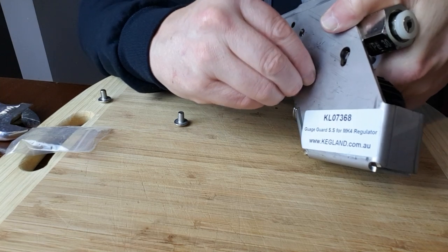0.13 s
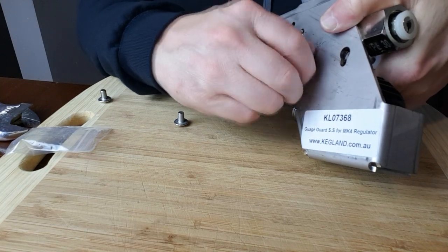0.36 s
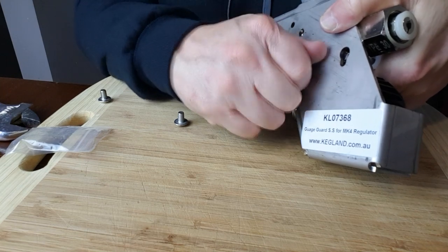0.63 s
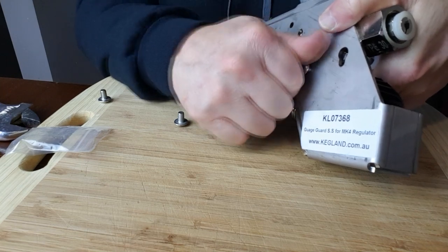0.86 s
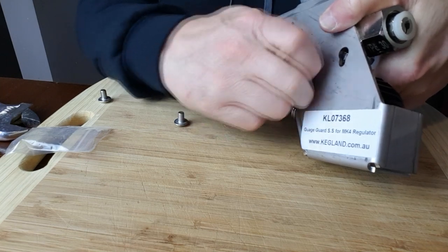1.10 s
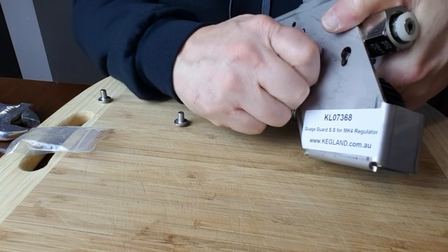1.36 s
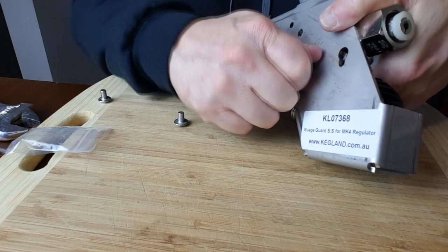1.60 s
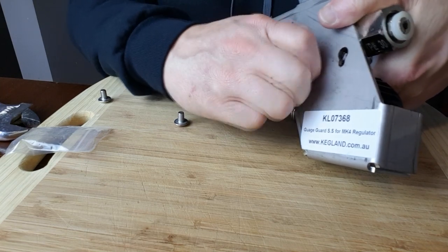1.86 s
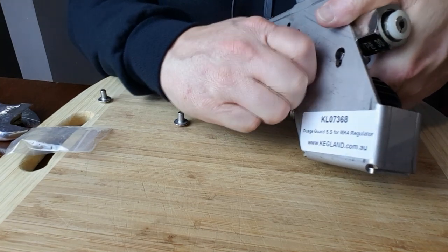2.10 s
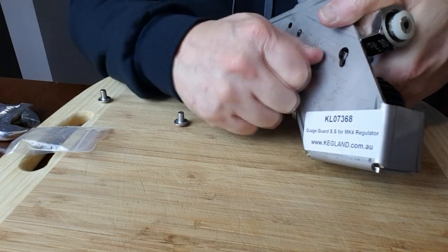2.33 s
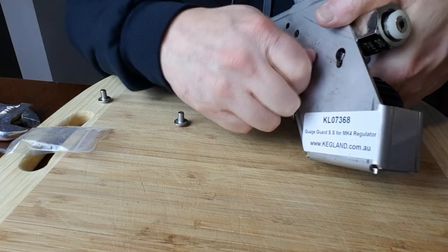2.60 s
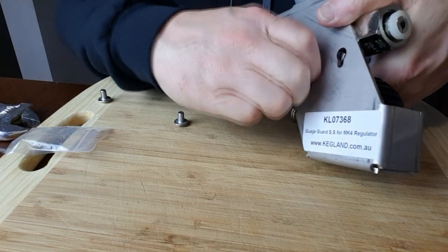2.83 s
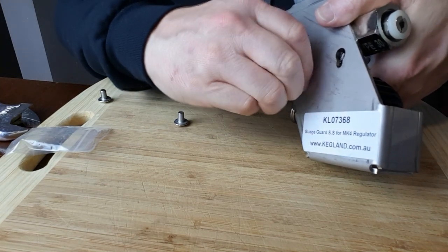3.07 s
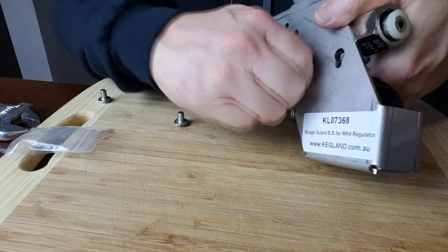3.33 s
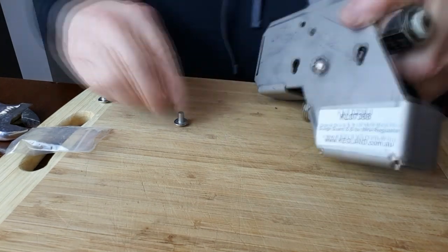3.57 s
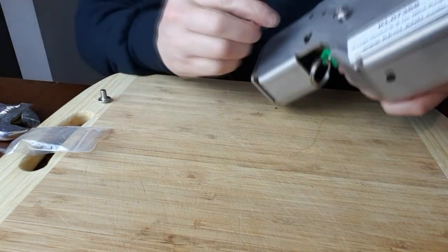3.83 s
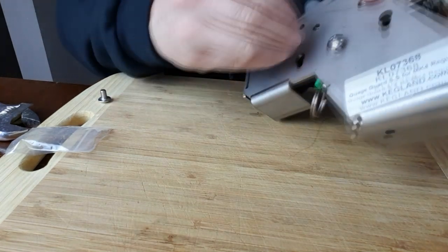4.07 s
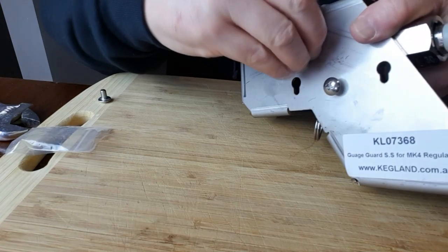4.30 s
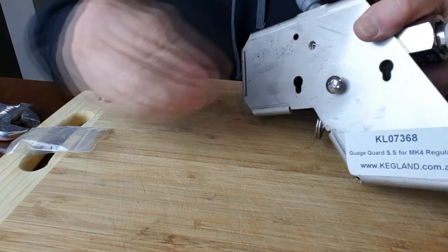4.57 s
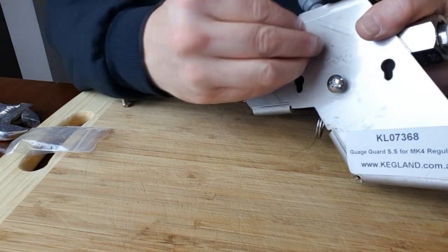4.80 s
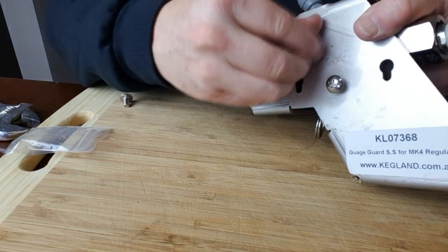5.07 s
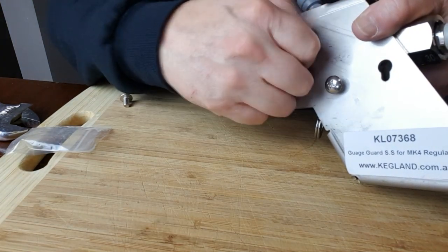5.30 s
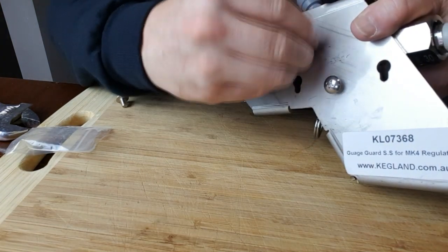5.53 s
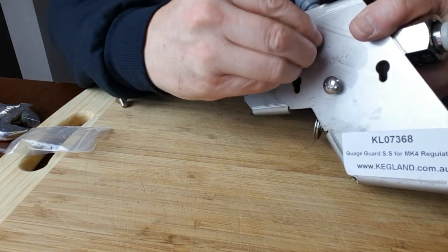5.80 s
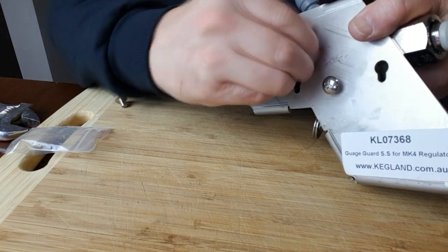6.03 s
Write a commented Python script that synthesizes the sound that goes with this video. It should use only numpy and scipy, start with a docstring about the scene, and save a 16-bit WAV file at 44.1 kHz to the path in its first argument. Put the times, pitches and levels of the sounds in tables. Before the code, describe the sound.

Hands fidget with small screws in a sheet-metal part: dull booming knocks on wood, then brighter, lighter clicks and rattles in a quiet room.

```python
"""Small screws turned into a sheet-metal guard

The guard rests on a wooden board in a quiet room; it rocks and bumps, and forced modes of the board boom
into a close pair of microphones. Ticks, rattles and grating of screw and thread ring the modes of the sheet;
damped taps are short bands of noise, and fingers rub as coloured noise that swells and fades.
A short diffuse tail follows the metal; a soft room tone, a hum and a high hiss lie below."""
import sys
import numpy as np
from scipy import signal
from scipy.fft import rfft, irfft, next_fast_len
from scipy.io import wavfile

SR = 44100
rng = np.random.default_rng(int(sys.argv[2]) if len(sys.argv) > 2 else 0)


def gain_from_db(level_db):
    """Convert decibel levels to linear amplitude factors (20 dB per decade)."""
    decades = np.asarray(level_db, float) / 20
    return 10 ** decades


def to_wav(sig):
    """Store sig (one row per channel, or 1-D mono) as 16-bit WAV at the path in sys.argv[1].

    Samples outside -1..1 are clipped; the rate is SR.
    """
    pcm = np.clip(np.atleast_2d(sig), -1, 1) * 32767
    pcm = np.round(pcm).astype(np.int16)
    wavfile.write(sys.argv[1], SR, pcm.T)  # frames by channels


N = 271656   # samples

TURNED_S = 3.4   # the guard is let go and turned round; until then a hand presses it on the board
NEW_SCREW_S, SEATED_S = 4.16, 5.74   # a loose screw is brought to its hole; it has caught its thread

# Bumps of the guard on the board. Each row: start in seconds, strength in dB,
# knock on the upper modes in dB relative to it, boom pitch in Hz.
BUMPS = [(0.091, -34, -9, 96), (0.118, -41.5, -12, 114), (0.214, -42, -28, 120), (0.312, -35, -5.5, 111),
         (0.401, -42.5, -10, 118), (0.477, -37.5, -3.5, 114), (0.508, -36.5, -11, 116.6),
         (0.653, -42, -7.5, 127), (0.694, -40.5, -3, 114), (0.761, -43, -17, 117),
         (1.183, -51.5, -8.5, 112), (1.577, -32, -10.5, 111.3), (1.838, -33, -3.5, 119),
         (1.95, -53, 5.5, 129), (2.162, -48, -20, 104), (2.253, -40.5, -4, 100), (2.334, -38.5, -22, 95),
         (2.362, -43, -5, 119), (2.415, -36, -4.5, 119), (2.716, -38, -4, 115.5), (2.873, -44, -4, 115),
         (2.952, -43, -35, 115), (3.023, -50, -2, 116), (3.141, -41.5, -1.5, 117),
         (3.203, -41.5, -8.5, 117), (3.453, -39.5, -9.5, 141), (3.532, -47, 11.5, 127),
         (3.621, -26, -11.5, 123), (3.668, -33, -10, 178), (3.983, -35, -11.5, 125), (4.028, -40, -10, 125),
         (4.147, -39, -7, 98), (4.278, -30, -19.5, 88.3), (4.594, -39.5, -12.5, 85),
         (4.659, -49, -2.5, 123), (5.413, -48, -14, 109)]
# Modes of board and table. Each row: pitch in Hz, nominal width in Hz, relative level in dB.
BOARD_MODES = [(80, 3.9, -19), (96.7, 33, 4), (119, 15, 13), (144.9, 91, 9.5), (198.2, 21.5, 3),
               (239, 28.4, 4.5), (400.5, 11.7, -4.5), (465.5, 30.6, -5), (581.7, 30, -10), (670, 51, -12),
               (862, 65, -16.5), (1006, 17, -7.5)]
# Length of a push at the usual strength; it grows by so many dB per dB of strength.
PUSH_HELD_MS, PUSH_LOOSE_MS, PUSH_GROWS_DB, USUAL_PUSH_DB = 7.54, 2.86, 0.22, -40


def board(boom_db=-20.0, knock_base_db=1.5, knock_share=0.8, scatter_db=3.0):
    """Forced vibration: pushes shake low modes and knock upper ones; rocking is a lumpy random force."""
    s, strength_db, knock_db, boom_hz = np.transpose(BUMPS)[:, :, None]
    push_ms = np.where(s < TURNED_S, PUSH_HELD_MS, PUSH_LOOSE_MS)
    push_ms = push_ms * gain_from_db(PUSH_GROWS_DB * (strength_db - USUAL_PUSH_DB))
    ms = np.arange(4000) * 1000 / SR
    part = ms / np.clip(push_ms, 1, 15)
    shake = part * np.exp(1 - part) * np.sin(2 * np.pi * boom_hz * ms / 1000)
    knock_part = part / knock_share
    knock = grit(knock_part * np.exp(1 - knock_part), spread_db=-1.0)
    forces = shake * gain_from_db(boom_db + strength_db), knock * gain_from_db(knock_base_db + strength_db + knock_db)
    rocking = gain_from_db(rocking_db())
    lumps = rms_one(gain_from_db(2.03 * drift(7.3)) * rng.standard_normal(N))
    chance_db = scatter_db * rng.standard_normal((len(s), len(BOARD_MODES)))
    out = 0
    # modes above 170 Hz are the upper ones
    for k, (hz, width_hz, db, upper) in enumerate(evened(BOARD_MODES, [170])):
        pushes = lay(s[:, 0], forces[upper] * gain_from_db(upper * chance_db[:, [k]]))
        out = out + gain_from_db(db) * resonance(pushes + lumps * rocking[upper], hz, width_hz)
    return out


# Force of the guard rocking on the board. Each row: time in seconds, force in dB.
ROCKING = [(0, -49.5), (.45, -52.5), (.72, -42), (.87, -57.5), (1.5, -59), (1.64, -47), (1.78, -61.5),
           (1.95, -60), (2.5, -49.5), (2.65, -58.5), (2.78, -48), (3.5, -58), (3.7, -52), (3.75, -112),
           (3.96, -66), (4.0, -54), (4.36, -67), (5.8, -69), (6.16, -60)]
# Upper modes at the usual force; share of the force's swing that they follow.
UPPER_DB, UPPER_FOLLOWS, USUAL_ROCKING_DB = -59.0, 1, -55


def rocking_db():
    """Common excitation: one rocking force drives the boom and, at its own level, the upper modes."""
    force_db, = in_time(ROCKING)
    return np.array([force_db, UPPER_DB + UPPER_FOLLOWS * (force_db - USUAL_ROCKING_DB)])


# Modes of sheet and screw. Each row: pitch in Hz, nominal width in Hz, relative level in dB.
SHEET_MODES = [(1070, 40, -6), (1605, 70, -3), (1930, 50, -7), (2140, 100, -3), (2525, 110, -2),
               (2740, 100, -5), (2985, 60, -3), (3135, 90, -6), (3600, 110, -5), (4120, 90, -1),
               (4245, 90, -2), (4335, 110, -1), (4667, 80, 1), (5090, 130, -7), (5440, 130, -9),
               (6175, 50, -2), (6550, 70, -4), (6950, 50, -5), (7375, 45, -3), (7563, 35, -4),
               (7850, 110, -4), (8350, 70, -10), (8725, 45, -9), (9460, 45, -11), (10230, 70, -13),
               (11130, 28, -6), (11500, 52, -12), (12620, 34, -9), (12880, 70, -10), (13260, 30, -4),
               (13570, 77, -12)]
# Colour of the broad crack of a contact. Each row: pitch in Hz, relative level in dB.
CRACK = [(500, -7), (1200, -8.5), (2450, -24), (4000, -38), (7500, -12.5), (14500, -14)]
# Hard single ticks. Each row: start in seconds, strength in dB, dull part in dB and bright part in dB
# relative to it, favoured pitch in Hz.
TICKS = [(0.0892, -40.5, -6, -9.5, 2650), (0.097, -46, 1, -21, 2000), (0.338, -42.5, -6, -39, 2230),
         (0.4752, -25, -9, -15, 4200), (1.1253, -58, 18, -17, 1610), (1.5852, -47, 17, -29, 4260),
         (1.8387, -46, -2, -10, 4300), (2.255, -49.5, 10.5, -19, 1950), (2.324, -56, 4, -17, 2500),
         (2.362, -47.5, -1, -18, 3600), (2.418, -53.5, 7, -15, 4300), (2.7219, -44.5, -7, -7, 4350),
         (2.733, -42, -1, -20, 1310), (2.862, -47.5, 6, -21, 4400), (2.9956, -51, 9, -32, 2430),
         (3.051, -55, -5, -23, 3100), (3.15, -47, -7, -23, 2900), (3.262, -57, 0, -19, 2200),
         (3.3, -51.5, 5.5, -27, 2500), (4.1877, -37.5, -34, 4.5, 4220), (4.269, -37, -31, -25, 4620),
         (4.334, -60, -25, 0, 4900), (4.398, -52.5, -18, -4, 4300), (4.403, -48, -25, -15, 4300),
         (4.418, -57.5, -28, -1, 4320), (4.475, -47, -29, -9, 4280), (4.8613, -43, -13, -24, 4800),
         (4.902, -37.5, -9, -12, 4340), (4.913, -41, -28, -25, 2900), (5.236, -57, -5, -17, 2000),
         (5.4288, -46, -13, -9.5, 4770), (5.5081, -62.5, -5, 21, 3160), (5.653, -66, -3, -1, 4300),
         (5.665, -54.5, -6, -8, 4320), (5.677, -59, -9, 2, 4600), (5.6919, -48.5, -21, 0, 4370)]
# Rattle and grating of thread and screw head. Each row: time of the peak in seconds, strength in dB,
# bright part in dB relative to it, fade time in ms (held within 1 to 22), favoured pitch in Hz.
RATTLES = [(0.316, -42.5, -17, 9, 3200), (0.986, -59, 1, 16, 4300), (1.15, -51, -7, 13.4, 4240),
           (1.575, -45, -32, 4.6, 1700), (1.906, -54, -14, 25, 2700), (2.377, -52, -7, 27, 3020),
           (2.876, -52.5, -16, 17, 2900), (3.315, -46.5, -30, 7.6, 1050), (3.679, -51.5, -14, 10, 2900),
           (3.868, -50, -29, 6.8, 2500), (3.895, -33.5, -16, 11.3, 2580), (4.148, -51.5, -14, 11.3, 2440),
           (4.18, -50, 1, 10.7, 2500), (4.204, -50, -6, 5.3, 4300), (4.238, -35, -13.5, 9.1, 4300),
           (4.265, -38, -19, 5, 4640), (4.279, -42.5, -18, 9.7, 2800), (4.373, -55, -11, 7.1, 4200),
           (4.407, -49.5, -2, 7.8, 2900), (4.465, -62, -9, 9.1, 4340), (4.494, -49, -3, 4.4, 4300),
           (4.507, -35.5, -7, 7, 4500), (4.553, -54.5, -1, 5.2, 4500), (4.864, -40.5, -26, 7.4, 2130),
           (4.897, -48, 0, 7.5, 4300), (4.912, -41.5, -0.5, 6, 2200), (4.982, -54, -3, 7.9, 4730),
           (5.085, -61.5, -9, 5, 4220), (5.121, -59.5, 1, 4.2, 4330), (5.296, -62.5, -10, 15, 2500),
           (5.431, -46, -8, 11.3, 4730), (5.516, -60, 10, 11.5, 3140), (5.685, -61, 9, 6.8, 4640)]
# Fade of a tick's tail at the usual strength; harder ticks last longer by so many dB per dB.
TICK_FADE_MS, FADE_GROWS_DB, USUAL_TICK_DB = 1.36, 0.86, -50
TICK_GAIN_DB = 10.0   # common to ticks and fidgets
SWELL_SHARE = 1.4   # rise time over fade time
# A seated screw drives the low modes, a loose one hardly.
RATTLE_DULL_SEATED_DB, RATTLE_DULL_LOOSE_DB = 2.5, -20.5
HELD_DAMPING_DB = -4.5   # the pressing hand mutes the sheet's ringing
SCREW_HZ, BEFORE_SCREW_DB = (4000, 5200), -8   # the loose screw's modes; they are weaker until it is brought


def sheet(scatter_db=2.5, crack_db=-8.0, rattle_crack_db=-8.5, favour_db=5.0, rattle_db=-7.0):
    """Modal synthesis: hard ticks and swelling rattles ring the sheet's modes and crack over broad bands."""
    ms = np.arange(4000) * 1000 / SR
    ticks, rattles = np.array(TICKS), np.array(RATTLES)
    tail_ms = TICK_FADE_MS * gain_from_db(FADE_GROWS_DB * (ticks[:, [1]] - USUAL_TICK_DB))
    sudden = np.exp(-ms / 0.29) + 0.11 * np.exp(-ms / tail_ms)
    fade_ms = np.clip(rattles[:, [3]], 1, 22)
    swell_ms = SWELL_SHARE * fade_ms
    swelling = np.sin(np.pi / 2 * np.minimum(ms / swell_ms, 1)) ** 2
    swelling = swelling * np.exp(-np.maximum(ms - swell_ms, 0) / fade_ms)
    tick_bursts = gain_from_db(TICK_GAIN_DB) * grit(sudden, spread_db=2.0)
    rattle_bursts = gain_from_db(rattle_db) * grit(swelling, spread_db=-0.5)
    bursts = np.vstack([tick_bursts, rattle_bursts])

    seat_db = np.where(rattles[:, 0] < NEW_SCREW_S, RATTLE_DULL_SEATED_DB, RATTLE_DULL_LOOSE_DB)
    rattle_rows = np.c_[rattles[:, :2], seat_db, rattles[:, 2]]
    s, strength_db, dull_db, bright_db = np.vstack([ticks[:, :4], rattle_rows]).T[:, :, None]
    s = s - np.vstack([0 * ticks[:, [0]], swell_ms / 1000])   # a rattle starts one swell before its peak
    favoured_hz = np.vstack([ticks[:, [4]], rattles[:, [4]]])

    crack = [(hz, hz / 4, crack_db + at_hz(CRACK, hz)) for hz in np.geomspace(550, 14500, num=12)]
    # the spot touched favours other modes
    chance_db = scatter_db * rng.standard_normal((len(s), len(SHEET_MODES) + len(crack)))
    grating, fidgeting = grate(), fidgets()
    out = 0
    for k, (hz, width_hz, db, _) in enumerate(evened(SHEET_MODES + crack, [1500, 5500])):
        rings = k < len(SHEET_MODES)
        dull = at_hz([(1200, 0.83), (1750, 0.02)], hz)
        bright = at_hz([(4800, 0.012), (7000, 0.72)], hz)
        level_db = strength_db + dull * dull_db + bright * bright_db + chance_db[:, [k]]
        level_db += favour_db * np.exp(-(np.log(hz / favoured_hz) / 0.25) ** 2)
        level_db += HELD_DAMPING_DB * (s < TURNED_S) * rings
        level_db += BEFORE_SCREW_DB * (s < NEW_SCREW_S) * rings * (SCREW_HZ[0] < hz < SCREW_HZ[1])
        level_db[len(TICKS):] += rattle_crack_db * (not rings)   # a rattle rings more than it cracks
        force = lay(s[:, 0], bursts * gain_from_db(level_db))
        force = force + fidgeting * gain_from_db(-15.0 * dull - 14.0 * bright)
        force = force + grating * gain_from_db(-15.0 * bright)
        out = out + gain_from_db(db) * resonance(force, hz, width_hz)
    return out


def grate(grate_db=-24.0):
    """Friction noise: the thread grates faintly and unevenly, following the rocking force."""
    return gain_from_db(grate_db + rocking_db()[1] + 1.43 * drift(91)) * rng.standard_normal(N)


FIDGETS_PER_S, FIDGET_DB = 52, -66   # rate before its slow drift; base level before the tick gain


def fidgets():
    """Random point process: the screw ticks faintly by chance while fingers turn it."""
    t = np.arange(N) / SR
    turning = (t < TURNED_S) | (t > NEW_SCREW_S) & (t < SEATED_S)
    touched = (rng.random(N) < FIDGETS_PER_S * gain_from_db(5.0 * drift(4)) / SR) * turning
    size_db = FIDGET_DB + 1.0 * np.minimum(rng.exponential(1, N), 3) + TICK_GAIN_DB
    return touched * gain_from_db(size_db) * rng.choice([-1, 1], N)


# Dry taps on a part that the hand damps. Each row: start in seconds, peak in dB before the band
# reaches the microphones, low edge in Hz, high edge in Hz.
TAPS = [(0.4765, -26, 750, 11600), (1.5838, -35, 400, 850), (1.838, -37, 400, 850),
        (1.9555, -46, 400, 2600), (1.9885, -37, 500, 2800), (4.1883, -31, 2200, 14500),
        (4.7814, -37, 1300, 4500), (4.7965, -37, 1300, 4000)]
TAP_FADE_MS, TAP_TAIL_MS, TAP_TAIL_SHARE = 0.8, 5.0, 0.2


def taps():
    """Heavy damping: a short burst of grit in a broad band, without modal ringing."""
    ms = np.arange(1500) * 1000 / SR
    shape = np.exp(-ms / TAP_FADE_MS) + TAP_TAIL_SHARE * np.exp(-ms / TAP_TAIL_MS)
    bursts = grit(shape * np.ones((len(TAPS), 1)), spread_db=2.0)
    out = 0
    for (s, db, low_hz, high_hz), burst in zip(TAPS, bursts):
        band = signal.butter(3, [low_hz, high_hz], "band", fs=SR, output="sos")
        burst = signal.sosfilt(band, burst)
        track = lay([s], gain_from_db(db) * burst[None] / np.abs(burst).max())
        analytic = signal.hilbert(track, next_fast_len(N))[:N]
        out = out + to_pair(analytic, np.sqrt(low_hz * high_hz))
    return out


# Colour of skin on sheet. Each row: pitch in Hz, relative density in dB per Hz.
RUB = [(410, -26), (700, -0.5), (1190, -6), (1290, -5), (1970, -6), (2660, -10), (9000, -26.5),
       (13500, -27), (19800, -120)]
# Light rustle of the fingers. Each row: time in seconds, level in dB.
RUBBING = [(0, -66), (.85, -72.5), (2, -69.5), (3.75, -74), (6.16, -78)]
# A hand slides along the sheet. Each row: start in seconds, length in seconds, rub level in dB,
# swish pitch in Hz, swish level in dB.
SLIDES = [(-.05, 0.43, -100, 1890, -64.5), (0.47, 0.13, -63.5, 2660, -72), (0.67, 0.17, -65.5, 980, -79),
          (3.523, 0.2, -63, 1700, -64), (4.02, 0.078, -63, 5400, -75), (4.643, 0.056, -111, 1660, -64.5),
          (5.931, 0.075, -90, 1520, -69.5), (6.076, 0.14, -78.5, 1700, -73)]
SWISH_WIDTH_SHARE = 0.63   # of its pitch
SKIN_FLICKER_DB = 2.2
SKIN_GRAIN_DB, SKIN_GRAIN_PER_S = 1.5, 55   # skin sticks and slips


def fingers():
    """Friction noise: a light rustle, and slides that rise fast and ease off, each with its own swish."""
    t, skin, air = np.arange(N) / SR, steady(RUB, SKIN_FLICKER_DB), rng.standard_normal(N)
    grain = rms_one(gain_from_db(SKIN_GRAIN_DB * drift(SKIN_GRAIN_PER_S)))
    skin, air = skin * grain, air * grain
    out = gain_from_db(in_time(RUBBING)[0]) * skin
    for start_s, length_s, db, hz, swish_db in SLIDES:
        part = np.clip((t - start_s) / length_s, 0, 1)
        stroke = np.sin(np.pi * part ** 0.49) ** 0.6 * (part < 1)
        swish = rms_one(resonance(air, hz, SWISH_WIDTH_SHARE * hz))
        out = out + stroke * (gain_from_db(db) * skin + gain_from_db(swish_db) * swish)
    return out


ROOM_T60_S, ROOM_SHARE_DB = 0.084, -12.5


def room(x):
    """Reverberation: a short, dull, diffuse tail of decaying noise, different at each microphone."""
    t = np.arange(SR // 3) / SR
    tail = rng.standard_normal((2, len(t))) * gain_from_db(-60 * t / ROOM_T60_S) * (t > .006)
    tail = signal.sosfilt(signal.butter(1, [300, 6000], "band", fs=SR, output="sos"), tail)
    tail = tail / np.sqrt(np.sum(tail ** 2) / 2)
    return gain_from_db(ROOM_SHARE_DB) * signal.fftconvolve(x, tail, axes=1)[:, :N]


# Colour of the room tone. Each row: pitch in Hz, relative density in dB per Hz.
ROOM_TONE = [(15, -55), (25, -32), (59, 4), (203, -9), (253, 0), (279, -29.5), (366, -7), (425, -10),
             (469, -11.5), (9000, -66), (11700, -79), (19800, -120)]
ROOM_DB, ROOM_FLICKER_DB = -70, 1.5


def room_tone():
    """Stationary noise: a faint tone of the room, shaped in its spectrum and gently uneven."""
    return gain_from_db(ROOM_DB) * steady(ROOM_TONE, ROOM_FLICKER_DB)


def hum(hz=250, width_hz=47, db=-74):
    """Resonant filtering: white noise through one narrow resonance gives a soft, blurred hum."""
    return gain_from_db(db) * rms_one(resonance(rng.standard_normal(N), hz, width_hz))


# Course of the high hiss. Each row: time in seconds, level in dB.
HISS = [(0.0, -70.5), (3.24, -70), (3.64, -78.5), (6.16, -80.5)]
# Colour of the hiss. Each row: pitch in Hz, relative density in dB per Hz.
HISS_COLOUR = [(3530, 5), (6000, -4), (7940, -7), (9640, -5.5), (15100, 2), (15800, 5)]
HISS_FLICKER_DB = 0.5


def hiss():
    """Coloured noise: a hiss whose level follows a drawn course."""
    return gain_from_db(in_time(HISS)[0]) * steady(HISS_COLOUR, HISS_FLICKER_DB)


# Likeness of steady sounds at the two microphones. Each row: pitch in Hz, correlation from 0 to 1.
LIKENESS = [(60, 0.98), (180, 0.88), (550, 0.4), (1650, 0.22), (4970, 0.12), (15000, 0.17)]


def steady(spectrum, flicker_db):
    """Partial coherence: stereo noise of a given colour and likeness, gently uneven; rms 1."""
    hz = np.clip(np.arange(N // 2 + 1) * SR / N, 10, None)
    mid, side = rfft(rng.standard_normal((2, N))) * gain_from_db(at_hz(spectrum, hz))
    alike = np.clip(at_hz(LIKENESS, hz), 0, 1)
    pair = np.sqrt(1 + alike) * mid + np.sqrt(1 - alike) * side * [[1], [-1]]
    return rms_one(irfft(pair, N) * gain_from_db(flicker_db * drift(10.4)))


# Phase at the microphone pair. Each row: pitch in Hz, lead of the left in radians.
LEAD = [(60, -0.18), (500, 0.92), (1000, 1.43), (2240, 0.7), (2670, 0.78), (4310, 1.61), (7580, 1.97),
        (9730, 1.3), (13200, 2.25)]
# Level at the microphone pair. Each row: pitch in Hz, left over right in dB.
LEAN = [(60, 1.5), (380, 1.5), (2380, 0.23), (15000, -1.5)]


def to_pair(analytic, hz):
    """Phase and level differences: a narrow band reaches each microphone with its own phase and level."""
    turn = np.exp(.5j * at_hz(LEAD, hz)) * gain_from_db(at_hz(LEAN, hz) / 2)
    return np.array([(analytic * turn).real, (analytic / turn).real])


def resonance(x, hz, width_hz):
    """Damped oscillation: one mode as a complex pole, behind a broad pole that steepens its skirts."""
    turn = np.exp(2j * np.pi * hz / SR)
    widths_hz = np.array([max(0.24 * hz, 110), np.clip(width_hz, 4, 4000)])
    for r in np.exp(-np.pi * widths_hz / SR):
        x = signal.lfilter([1 - r], [1, -r * turn], x + 1e-18j)
    return to_pair(x, hz)


def evened(modes, edges_hz):
    """Power summation: modes sorted into pitch regions, each passing white noise of rms 1 at rms 1."""
    hz, width_hz, db = np.transpose(modes)
    region = np.searchsorted(edges_hz, hz)
    power = np.bincount(region, gain_from_db(2 * db) * width_hz * np.pi / SR / 4)
    return zip(hz, width_hz, db - 10 * np.log10(power[region]), region)


def grit(shape, spread_db):
    """Micro-impacts: dense tiny hits of uneven size; each burst keeps the energy of its envelope."""
    size = gain_from_db(spread_db * np.minimum(rng.exponential(1, shape.shape), 4))
    rough = shape * size * rng.standard_normal(shape.shape)
    energy = np.sum(shape ** 2, axis=1, keepdims=True)
    return rough * np.sqrt(energy / np.sum(rough ** 2, axis=1, keepdims=True))


def lay(starts_s, bursts):
    """Superposition: each burst is added at its time."""
    track = np.zeros(N + bursts.shape[1])
    for s, burst in zip(starts_s, bursts):
        track[round(s * SR):][:len(burst)] += burst
    return track[:N]


def drift(rate, size=N):
    """Low-passed chance: slow noise of rms 1, its two poles at the rate in Hz."""
    r = np.exp(-2 * np.pi * rate / SR)
    slow = signal.lfilter([1], [1, -2 * r, r * r], rng.standard_normal(size + SR))
    return rms_one(slow[SR:])   # the first second lets the filter settle


def rms_one(x):
    """Normalisation: scale to unit rms."""
    return x / np.sqrt(np.mean(np.abs(x) ** 2) + 1e-20)


def in_time(rows):
    """Linear interpolation: columns of a curve, sample by sample."""
    s, *columns = np.transpose(rows)
    return [np.interp(np.arange(N) / SR, s, c) for c in columns]


def at_hz(points, hz):
    """Logarithmic pitch: read a spectrum on a log-frequency axis."""
    points = np.array(points)
    return np.interp(np.log(hz), np.log(points[:, 0] + 1), points[:, 1])


def scene():
    """Superposition: metal and its tail, board, fingers and the quiet room add up."""
    metal = sheet() + taps()
    return board() + metal + room(metal) + fingers() + room_tone() + hum() + hiss()


def band_limit(x):
    """A steep low-pass at the top of the band."""
    return signal.sosfilt(signal.butter(12, 16500, fs=SR, output="sos"), x)


def record(dry):
    """Band limiting: a steep low-pass and a gentle high-pass cut both ends of the spectrum."""
    cut = signal.sosfilt(signal.cheby2(12, 60, 16400, fs=SR, output="sos"), dry)   # 60 dB down at 16400 Hz
    cut = signal.sosfilt(signal.butter(2, 40, "high", fs=SR, output="sos"), cut)
    return band_limit(cut)


dry = scene()
out = record(dry)
to_wav(out)
```